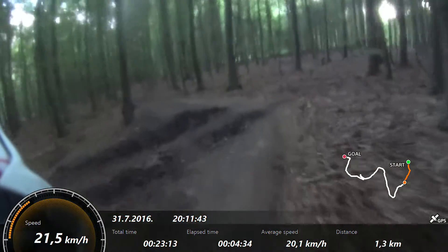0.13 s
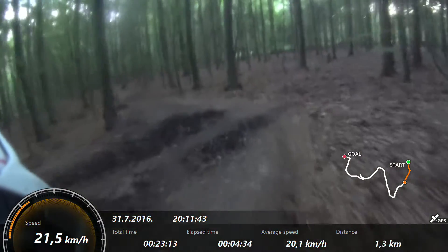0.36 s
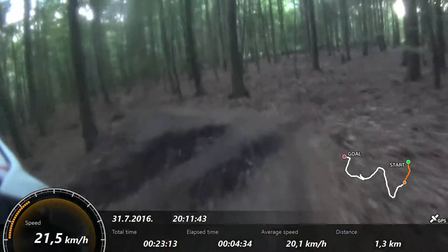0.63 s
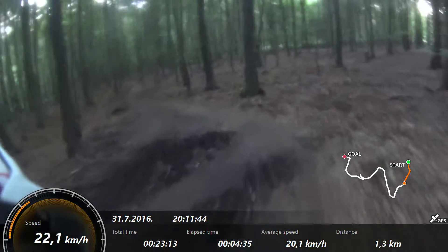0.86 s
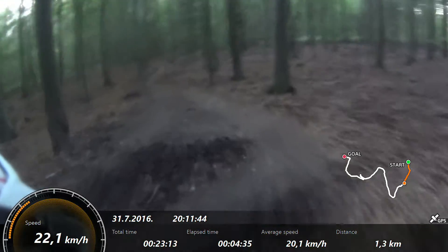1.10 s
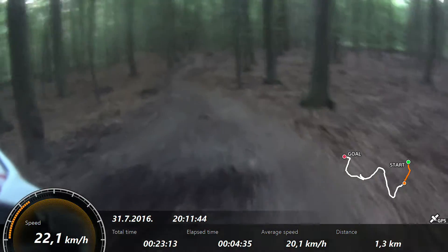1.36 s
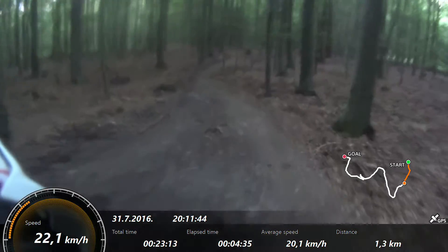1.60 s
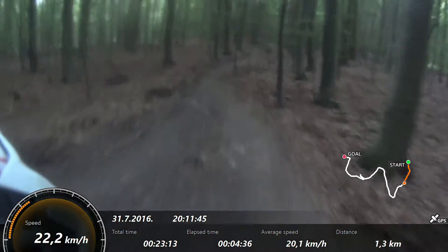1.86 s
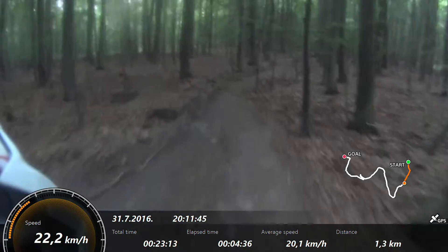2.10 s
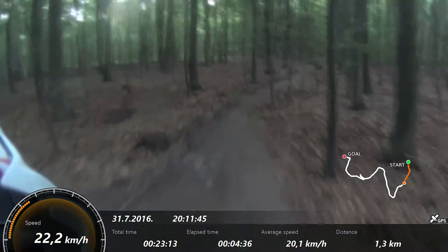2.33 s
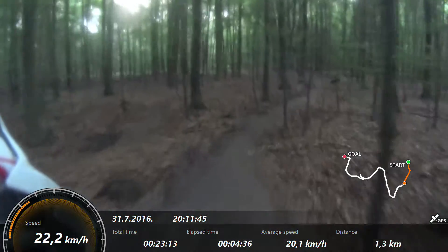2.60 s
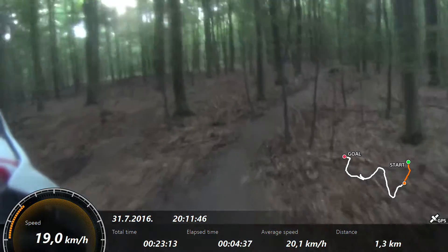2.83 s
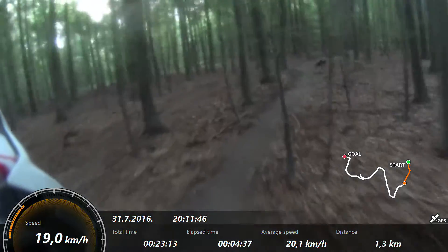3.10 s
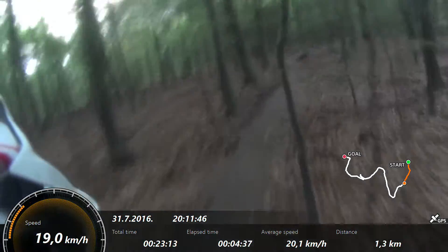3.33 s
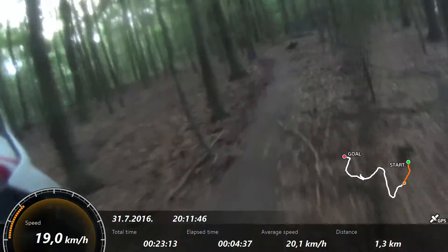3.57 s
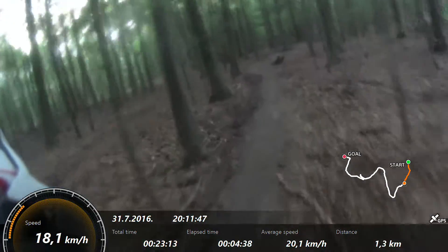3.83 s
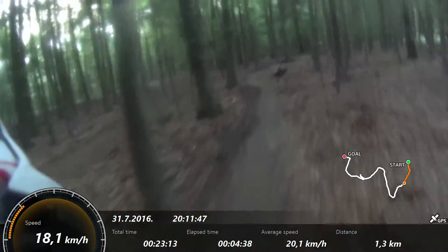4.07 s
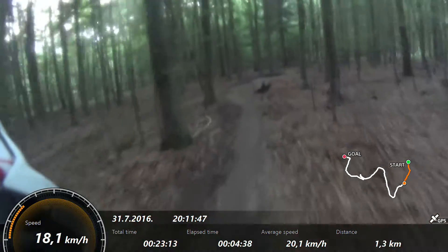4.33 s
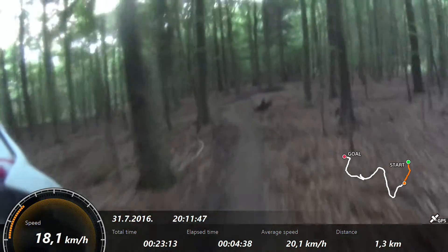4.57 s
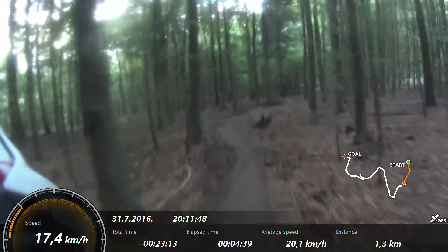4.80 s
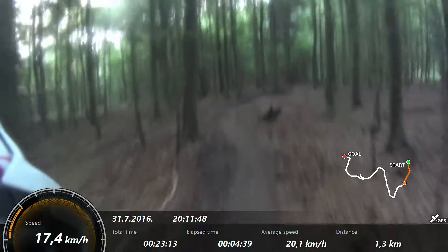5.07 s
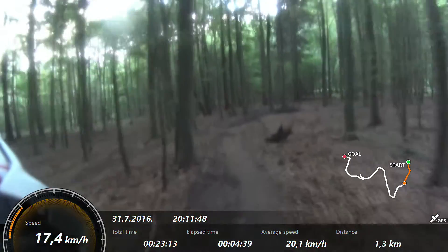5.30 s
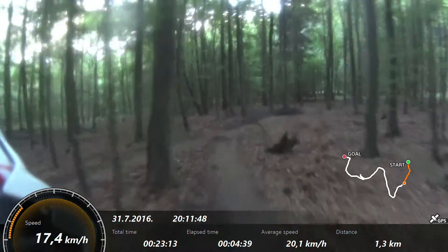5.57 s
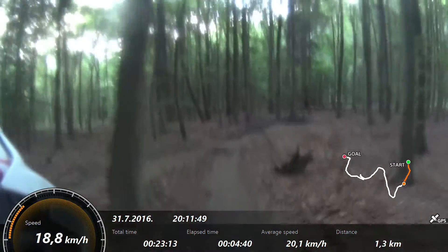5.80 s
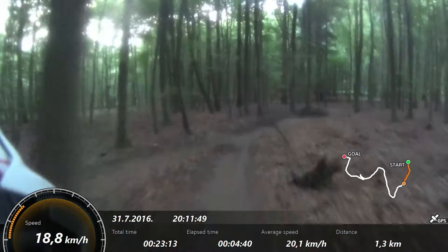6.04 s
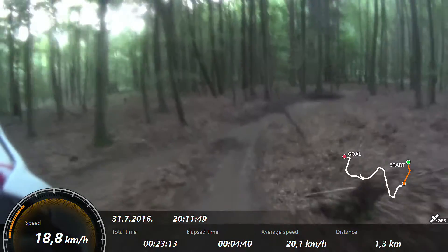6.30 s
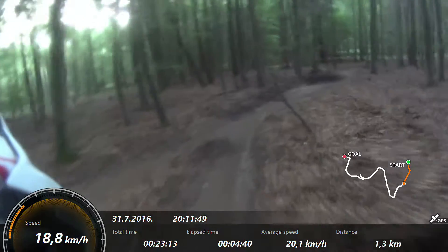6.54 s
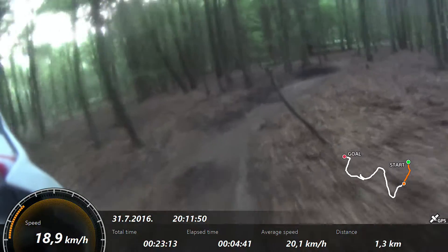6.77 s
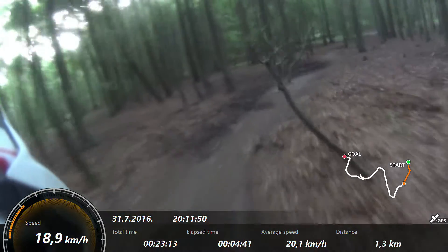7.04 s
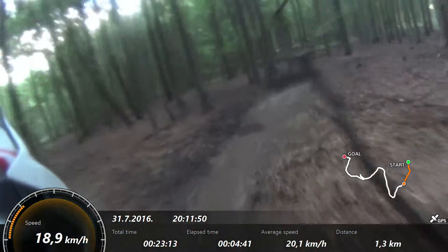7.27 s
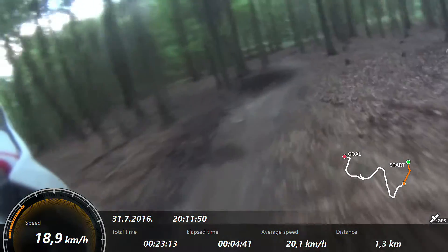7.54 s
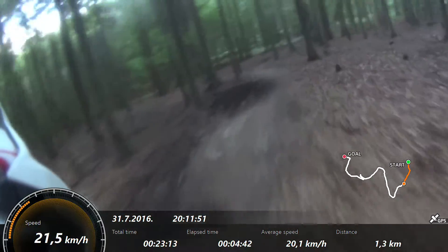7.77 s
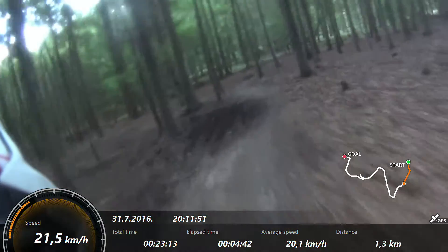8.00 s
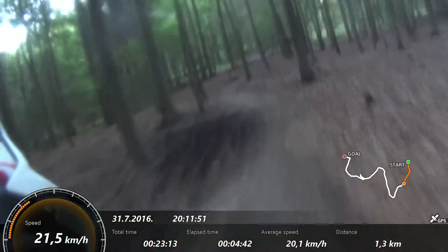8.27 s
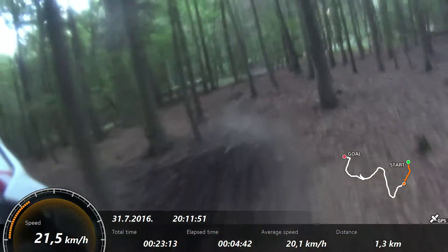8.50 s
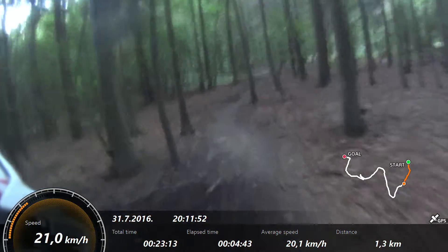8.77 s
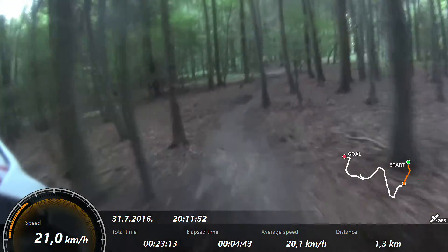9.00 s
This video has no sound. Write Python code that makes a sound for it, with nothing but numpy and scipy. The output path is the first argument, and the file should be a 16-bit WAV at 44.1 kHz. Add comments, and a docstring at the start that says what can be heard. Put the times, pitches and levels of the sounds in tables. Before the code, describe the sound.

A mountain bike descends a forest dirt trail, heard close through a small camera's closed case, muffled, boxy and slightly stereo. Tyre roar, low rumble and crunching grit and leaves run throughout, easing until about 2 s. A lone knock comes at 1.2 s, then a rapid cluster of dull knocks at 2.2-2.55 s. The brake hisses around 2.7-3.05 s, and bright, hard chain slaps clatter at 3.05-3.5 s over a swell of leaf crunch. Separate knocks and thuds follow from 3.6 to 5 s, with a tiny rough rising scrape at 4.9 s. The heaviest jolt lands at 5.95 s. Roar strengthens from 6 s; sharp slaps hit at 6.65 s, knocks at 7.2 s and a slap at 7.6 s. Between 8.1 and 8.9 s knocks and chain rattles return with sideways tyre scrub, and short brake hisses close the passage at about 9.1 s.

```python
"""Tyre roar and a crunch of grit and leaves run throughout: a mountain bike descends a forest dirt trail.
Dull knocks of frame and mount, a hissing brake, bright chain slaps and one short rising scrape come on top.
Tyres and litter are shaped noise heard through the resonances of a small camera's closed case.
Knocks and slaps are jolts that ring damped parts, the brake is resonant noise, the scrape a rough glide.
Two close microphones hear nearly the same."""
import sys
import numpy as np
from scipy import signal
from scipy.io import wavfile
from scipy.ndimage import uniform_filter1d

SR = 44100
rng = np.random.default_rng(int(sys.argv[2]) if len(sys.argv) > 2 else 0)


def nominal_scale(level):
    """Amplitude ratio for a level in decibels (scalar or array-like)."""
    x = np.asarray(level, float) / 20
    return 10 ** x


def persist_wave(psi):
    """Save psi, clipped to +-1, as 16-bit WAV."""
    counts = np.round(np.clip(psi, -1, 1) * 32767).astype(np.int16)
    wavfile.write(sys.argv[1], SR, np.atleast_2d(counts).T)


N = 402633
TIME = np.arange(N) / SR
HZ = np.fft.rfftfreq(4096, 1 / SR)


def unit_rms(x):
    """Scales to rms 1."""
    return x / np.sqrt(np.mean(x ** 2) + 1e-20)


def read_spectrum(points, hz):
    """Interpolates a spectrum table on a log-frequency axis."""
    point_hz, value = np.transpose(points)
    return np.interp(np.log(hz + 1), np.log(point_hz + 1), value)


def resonance_power(modes, steep):
    """Summed power gain of resonances; steep sets how fast their skirts fall."""
    return sum(nominal_scale(2 * db) / (1 + (2 * (HZ - hz) / width_hz) ** 2) ** steep for hz, width_hz, db in modes)


def coloured(x, power):
    """Minimum-phase filter with the given power gain over HZ."""
    log_gain = 0.5 * np.log(np.concatenate([power, power[-2:0:-1]]) + 1e-10)
    taps = np.fft.ifft(np.exp(np.conj(signal.hilbert(log_gain)))).real[:2048]
    return signal.oaconvolve(x, taps)[:N]


def wander(corner_hz):
    """Random drift of rms 1: noise at 200 steps a second through a one-pole low-pass."""
    steps = rng.standard_normal(int(N / SR * 200) + 2)
    smooth = signal.lfilter([1], [1, -np.exp(-2 * np.pi * corner_hz / 200)], steps)
    return np.interp(TIME * 200, np.arange(len(steps)), unit_rms(smooth))


def grains(per_s, spread_db, t60_s):
    """Randomly timed, decaying noise bursts of uneven size, rms 1 overall."""
    size = nominal_scale(spread_db * np.minimum(rng.exponential(1, N), 2.1))
    hits = size * (rng.random(N) < per_s / SR)
    power_decay = np.exp(-2 * np.log(1000) / (t60_s * SR))
    envelope = np.sqrt(signal.lfilter([1], [1, -power_decay], hits ** 2))
    return unit_rms(envelope * rng.standard_normal(N))


def swells(rows):
    """Gain of strokes that rise and fall straight in dB, power-summed, with smoothed tops."""
    slopes_db = (db - 20 * np.maximum((peak_s - TIME) / rise_s, (TIME - peak_s) / fall_s)
                 for peak_s, db, rise_s, fall_s in rows)
    return uniform_filter1d(np.sqrt(sum(nominal_scale(2 * db) for db in slopes_db)), size=600)


# roar driving the case: time_s, level_db
ROAR_LEVEL = [(0, -23), (0.45, -24), (0.8, -26), (1.5, -27.5), (2, -28.5), (2.25, -26.5), (3.0, -25.5),
              (3.55, -26), (4.05, -23.5), (4.5, -25), (5, -25.5), (5.5, -23.5), (5.8, -22), (6.9, -21),
              (7.4, -22), (7.8, -20), (8.85, -21.5), (9.13, -23)]
# roar colour: freq_hz, relative_db_per_hz
ROAR_COLOUR = [(500, 3), (1200, 1), (3000, -5), (12000, -11)]
# low frame rumble driving the case: time_s, level_db
RUMBLE_LEVEL = [(0, -30.5), (1.2, -35), (2.3, -32.5), (3.2, -36), (5, -34.5), (6.3, -32), (8.2, -29.5),
                (9.13, -30.5)]
# knobs sliding sideways: freq_hz, width_hz, relative_db
SCRUB_MODES = [(1880, 410, -1), (1430, 65, -2.5)]
# leans on the side knobs: peak_s, level_db, rise_s, fall_s (rise and fall over 20 dB)
LEANS = [(0, -28, .1, 0.22), (.5, -32.5, 0.48, 0.16), (3.55, -31, 0.44, .1), (3.84, -33, 0.15, .5),
         (4.03, -25, 0.55, 0.3), (5.39, -28.5, 0.12, 0.043), (6.88, -30.5, 0.12, 0.35),
         (7.27, -27, 0.24, 0.39), (7.9, -35, .08, .55), (8.45, -25.5, 0.053, .08), (8.65, -26, 0.12, 0.41),
         (8.9, -29, .4, .12)]


def tyres():
    """Knobs drum on dirt: unsteady noise with small-stone bursts, low rumble and a sideways scrub."""
    drum = rng.standard_normal(N) * nominal_scale(1.0 * wander(12.0))
    drum = drum + 0.25 * grains(150, spread_db=8.0, t60_s=0.0092)
    low = 1 / (1 + (HZ / 400) ** 6)
    roar = unit_rms(coloured(drum, nominal_scale(2 * read_spectrum(ROAR_COLOUR, HZ)) * (1 - low)))
    roar = roar * nominal_scale(np.interp(TIME, *np.transpose(ROAR_LEVEL)))
    rumble = unit_rms(coloured(rng.standard_normal(N), low)) * nominal_scale(1.63 * wander(6.4))
    rumble *= nominal_scale(np.interp(TIME, *np.transpose(RUMBLE_LEVEL)))
    scrub = unit_rms(coloured(rng.standard_normal(N), resonance_power(SCRUB_MODES, steep=1.3)))
    scrub *= nominal_scale(2.7 * wander(9.8))
    return roar + rumble + scrub * swells(LEANS)


# crunch colour: freq_hz, relative_db_per_hz
CRUNCH_COLOUR = [(300, -26), (1500, -21), (3000, -2.5), (12000, -2.5)]
# drifts of leaves and grit: peak_s, level_db, rise_s, fall_s (rise and fall over 20 dB)
LEAF_DRIFTS = [(0, -18, 0.12, 1.9), (1.2, -21, .12, 0.052), (1.53, -17, 0.11, 0.12), (2.3, -18.5, 2.5, 2.1),
               (3.3, -14, 0.54, 0.33), (3.58, -14, 0.25, 0.092), (4.05, -20.5, 1.9, 2.1),
               (6.3, -20.5, 0.81, 1.9), (7.4, -15, 0.77, 0.56), (8.2, -15, 0.63, 0.53),
               (8.85, -16.5, 1.1, 2)]


def litter():
    """Grit and dry leaves break in clumps: low, coarse and high, fine crackle come partly apart."""
    floor_db = -25  # the thin crunch that never stops
    clumps_db = 1.8 * wander(9)
    fine = 1 / (1 + (4200 / (HZ + 1)) ** 8)  # above 4.2 kHz
    crunch = 0
    for band, snap_gain in ((fine, 1.3), (1 - fine, 0.7)):
        crackle = snap_gain * grains(250, spread_db=3.5, t60_s=0.012) + rng.standard_normal(N)
        crackle *= nominal_scale(np.minimum(clumps_db + 2.2 * wander(10), 3))
        crunch = crunch + coloured(crackle, band * nominal_scale(2 * read_spectrum(CRUNCH_COLOUR, HZ)))
    return unit_rms(crunch) * np.hypot(nominal_scale(floor_db), swells(LEAF_DRIFTS))


# dull knocks over roots and stones: start_s, knock_db, knock_hz, thud_db
BUMP_BLOWS = [(1.22, -19.5, 2720, -27), (2.19, -21, 2520, -21), (2.201, -19, 2600, -25),
              (2.268, -20.5, 2600, -37), (2.334, -20, 2460, -35), (2.343, -15, 2600, -39),
              (2.384, -19, 2550, -20), (2.432, -18, 2600, -26), (2.4826, -16.5, 2610, -33),
              (2.5443, -14.5, 2550, -34), (3.0183, -35, 2670, -17.5), (3.2, -16, 2360, -27),
              (3.614, -13, 1850, -22), (3.8394, -18, 2400, -30), (4.0851, -16.5, 2700, -28),
              (4.399, -18, 2540, -19), (4.5306, -15, 2630, -20), (4.6155, -16.5, 2650, -37),
              (4.765, -17.5, 2470, -13.5), (4.9738, -22, 2890, -26), (5.7621, -14.5, 2530, -30),
              (5.9405, -17, 2430, -17), (5.9455, -9.5, 2460, -8.5), (7.226, -15, 1850, -21),
              (7.244, -13, 2550, -19), (8.0991, -13.5, 2490, -30), (8.422, -14.5, 2530, -35),
              (8.5473, -18, 2500, -19), (8.806, -11.5, 2520, -17.5)]
# bright chain slaps: start_s, knock_db, knock_hz, clack_db, clack_hz, tick_db
CHAIN_SLAPS = [(2.246, -28, 2530, -30, 4900, -20.5), (3.07, -21, 2680, -24, 5800, -30),
               (3.08, -24, 2510, -22, 4900, -15.5), (3.118, -21, 2600, -19, 4830, -26),
               (3.124, -13, 2550, -8, 4850, -18), (3.1263, -15, 2550, -15, 4000, -24),
               (3.1734, -36, 2930, -27, 5000, -13.5), (3.2082, -7.5, 2450, -8, 4500, -24),
               (3.212, -7, 2480, -14, 4200, -24), (3.215, -16, 2600, -14, 4350, -12),
               (3.273, -17, 2500, -18, 4900, -16), (3.297, -10.5, 3400, -14, 4300, -11),
               (3.317, -13, 2480, -17, 4900, -16), (3.326, -15, 2550, -18, 4950, -24),
               (3.335, -16, 2600, -21, 4900, -25), (3.382, -21, 2650, -15, 4800, -17),
               (3.4221, -16, 2700, -16.5, 4700, -22), (3.504, -37, 2940, -20, 4760, -22),
               (3.5122, -36, 1860, -18, 4970, -16.5), (6.5305, -20, 2840, -22, 4700, -27),
               (6.645, -8, 3400, -14, 4230, -9), (6.681, -9, 2650, -22, 4750, -32),
               (7.587, -15, 1960, -19, 4280, -42), (8.2113, -23, 2490, -20, 5000, -17),
               (8.218, -15, 2660, -14.5, 5100, -13), (8.2303, -19, 2620, -27, 4800, -17),
               (8.2505, -16, 2650, -28, 4700, -32), (8.3747, -32, 2450, -28, 4800, -23),
               (8.583, -18, 3400, -27, 4600, -33), (8.8835, -21, 1880, -28, 4730, -22),
               (8.918, -23, 2540, -16, 4700, -19.5)]
# knock, thud, clack, tick: freq_hz (knock, clack: factor on the blow's pitch), ring_width_hz,
# snap_width_hz, jolt_t60_s
PART_RINGS = [(1, 400, 1300, 0.018), (1280, 155, 900, 0.027), (1, 620, 2000, 0.032),
              (7100, 1700, 3200, 0.036)]
# hardest contact over the rattle, one per ring: contact_ratio
CONTACT_PEAK = [17, 24, 10, 8]


def knocks(case):
    """A jolt, a click with a rattling tail, rings four parts of bike and mount; its thud rings the case."""
    bump_clack_hz, bump_clack_db, bump_tick_db = 4700, -16, -29  # levels re knock
    slap_thud_db, shell_db = -33, -6  # re knock, re thud
    blows = [(s, hz, bump_clack_hz, db, thud_db, db + bump_clack_db, db + bump_tick_db)
             for s, db, hz, thud_db in BUMP_BLOWS]
    blows += [(s, hz, clack_hz, db, db + slap_thud_db, clack_db, tick_db)
              for s, db, hz, clack_db, clack_hz, tick_db in CHAIN_SLAPS]
    length = 3000
    t = np.arange(length) / SR
    rattle = rng.standard_normal((len(blows), 4, length))
    rattle[:, :, 40] += CONTACT_PEAK  # hardest contact, once the load has built up
    out = np.zeros(N + length)
    for (s, knock_hz, clack_hz, *levels_db), jolts in zip(blows, rattle):
        pitches = [knock_hz, 1, clack_hz, 1]
        for (hz, *widths_hz, t60_s), db, jolt, pitch in zip(PART_RINGS, levels_db, jolts, pitches):
            turn = np.exp(2j * np.pi * hz * pitch / SR)
            ring = jolt * nominal_scale(-60 * t / t60_s) * np.minimum(t / 0.0018, 1)
            for pole in np.exp(-np.pi * np.array(widths_hz) / SR):  # sharp ring on a broader snap
                ring = signal.lfilter([1], [1, -pole * turn], ring)
            out[round(s * SR):][:length] += nominal_scale(db) * ring.real / abs(ring).max()
    clicks = np.zeros(N)
    for s, _, _, _, thud_db, *_ in blows:
        clicks[round(s * SR) + 50] = nominal_scale(thud_db + shell_db)
    shell = case / (1 + (HZ / 2200) ** 4) / (1 + (600 / (HZ + 1)) ** 4)
    shell_peak = abs(coloured(1.0 * (TIME[:2048] == 0), shell)).max()
    return out[:N] + coloured(clicks, shell) / shell_peak


# pulls on the brake: grab_s, hardest_s, let_go_s, hiss_db
BRAKE_PULLS = [(2.665, 2.775, 3.05, -22.5), (8.258, 8.3, 8.35, -32), (8.726, 8.77, 8.845, -24.5),
               (8.858, 8.897, 9.11, -27)]
# pad and disc, case included: freq_hz, width_hz, relative_db
PAD_MODES = [(4600, 970, -4), (4700, 3200, -19.5), (2600, 940, -9.5)]


def brake():
    """Pads rub the disc: resonant hiss that tightens, eases off and judders as the disc passes."""
    squeeze_db_per_s, ease_db_per_s, judder_db, judder_hz = 56, 38, 1.5, 7.2
    rub = rng.standard_normal(N) * nominal_scale(1.6 * wander(60))
    grip = np.zeros(N)
    for grab_s, hardest_s, let_go_s, db in BRAKE_PULLS:
        t = TIME - hardest_s
        level_db = db + np.minimum(squeeze_db_per_s * t, -ease_db_per_s * t)
        level_db += judder_db * np.cos(2 * np.pi * judder_hz * t)
        grip = grip + nominal_scale(level_db) * (TIME > grab_s) * (TIME < let_go_s)
    hiss = unit_rms(coloured(rub, resonance_power(PAD_MODES, steep=1.76)))
    return hiss * uniform_filter1d(grip, size=900)


# one scrape: start_s, length_s, level_db, from_hz, to_hz
SCRAPE = (4.91, .035, -31, 720, 1500)


def chirp():
    """A brief rough scrape: a sine gliding upwards with jittered pitch and noisy level."""
    start_s, length_s, db, from_hz, to_hz = SCRAPE
    u = np.clip((TIME - start_s) / length_s, 0, 1)
    hz = from_hz * (to_hz / from_hz) ** u * (1 + 0.055 * wander(57))
    rasp = unit_rms(uniform_filter1d(rng.standard_normal(N), size=110))
    envelope = nominal_scale(db) * (1 + 0.65 * rasp) * np.sqrt(np.sin(np.pi * u).clip(0))
    return envelope * np.sin(2 * np.pi * np.cumsum(hz) / SR)


# left-right likeness: freq_hz, same_share
LIKENESS = [(60, 1), (140, 0.91), (340, 0.95), (810, 1), (1940, 0.82), (4630, 0.92), (11000, 0.3)]
# left minus right: freq_hz, balance_db
BALANCE = [(60, 2), (140, -3), (340, -2.5), (810, -3.5), (1940, -1.5), (4630, 1.0), (11000, -3.5)]
# phase by which left leads: freq_hz, lead_rad
LEFT_LEAD = [(0, 0.92), (950, -0.69), (1980, 0.027), (2840, -0.36), (11200, -0.29)]


def two_microphones(steady, blows):
    """Two close ports differ in balance and phase; steady sound also has a diffuse part on the right."""
    hz, _, (steady, blows) = signal.stft(np.array([steady, blows]), SR, nperseg=512)
    diffuse = abs(steady) * np.exp(2j * np.pi * rng.random(steady.shape)) * 0.84  # random phase
    same = np.clip(read_spectrum(LIKENESS, hz), 0, 1)[:, None]
    tilt = nominal_scale(read_spectrum(BALANCE, hz) / 2)[:, None]
    lag = np.exp(-1j * read_spectrum(LEFT_LEAD, hz))[:, None]
    left = steady + blows
    right = (same * steady + np.sqrt(1 - same ** 2) * diffuse + blows) * lag
    return signal.istft(np.array([left * tilt, right / tilt]), SR, nperseg=512)[1][:, :N]


# case resonances: freq_hz, width_hz, gain_db
CASE_MODES = [(160.4, 42.5, -5), (241.7, 59, -4), (768, 126, -1), (1267, 197, 0), (1514, 150, 0),
              (1880, 367, -1), (2470, 324, 2.5), (2660, 240, 1), (2965, 370, -3.5), (4900, 630, -8),
              (6870, 100, -9.5), (7980, 190, -15)]
# leakage between the resonances: freq_hz, gain_db
CASE_LEAKAGE = [(20, -36), (60, -20), (120, -27), (450, -15.5), (1000, -47), (3700, -11), (8600, -17.5),
                (9300, -26.5), (11500, -18.5)]


def camera_case():
    """Power gain of the closed case: resonances below 9 kHz plus broad leakage."""
    return resonance_power(CASE_MODES, steep=1.524) * (HZ < 9000) + nominal_scale(2 * read_spectrum(CASE_LEAKAGE, HZ))


def scene():
    """Tyres and litter shake the case; brake, blows and scrape join at the microphones."""
    case = camera_case()
    steady = coloured(tyres() + litter(), case)
    blows = knocks(case)
    return two_microphones(steady + brake(), blows + chirp())


def top_cut(x):
    """Nothing passes above the cut-off."""
    return signal.sosfilt(signal.butter(12, 11630, fs=SR, output="sos"), x)


def record(dry):
    """The small recorder's soft overload and stepped band limit."""
    edge = signal.firwin2(257, [0, 8700, 9300, 11200, 11600, SR / 2], [1, 1, 0.3, 0.3, 0, 0], fs=SR)
    overloaded = np.tanh(dry / 1.1) * 1.097
    limited = signal.oaconvolve(overloaded, edge[None], "same")
    return top_cut(limited)


dry = scene()
out = record(dry)
persist_wave(out)
```